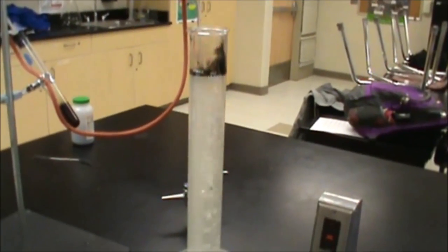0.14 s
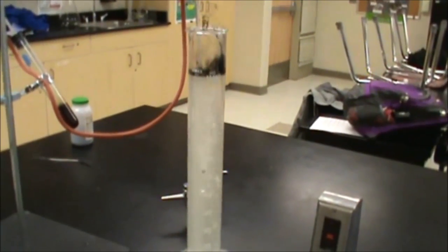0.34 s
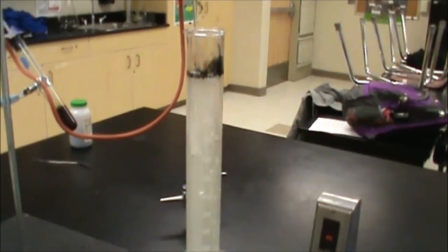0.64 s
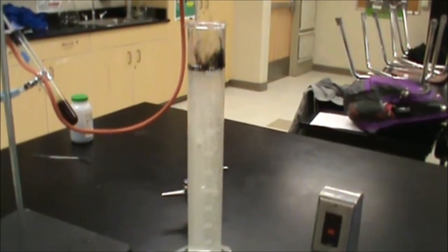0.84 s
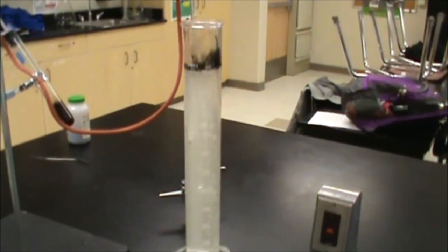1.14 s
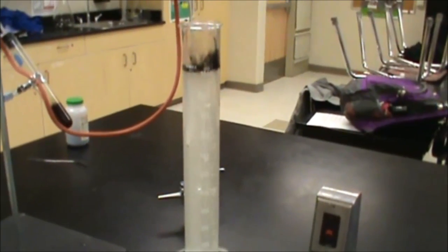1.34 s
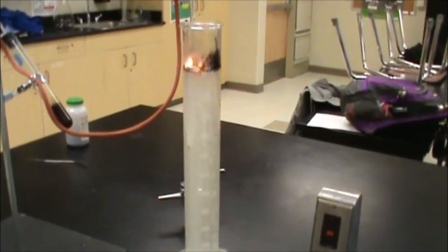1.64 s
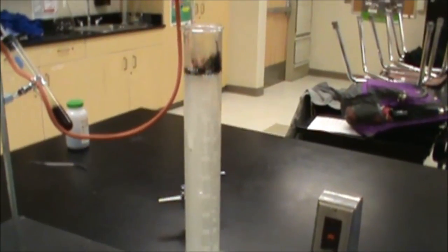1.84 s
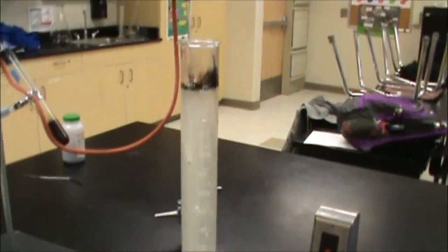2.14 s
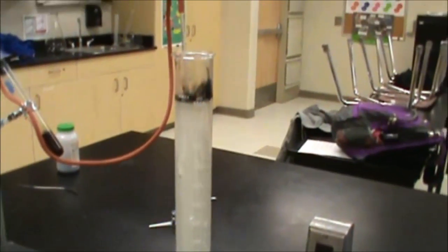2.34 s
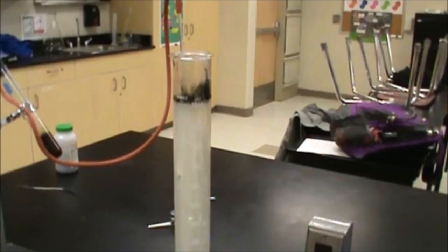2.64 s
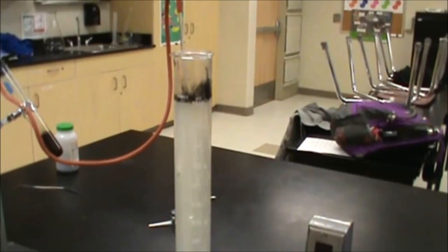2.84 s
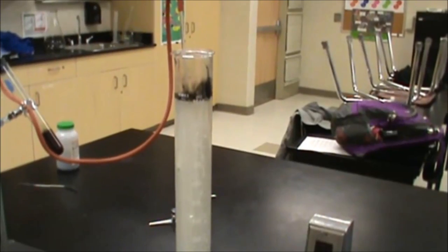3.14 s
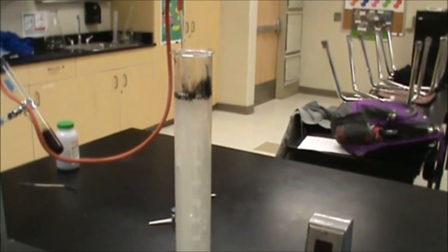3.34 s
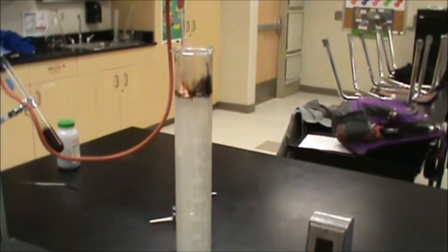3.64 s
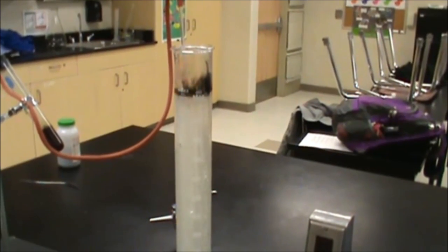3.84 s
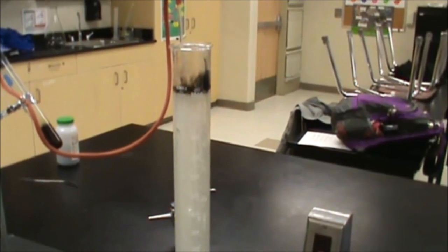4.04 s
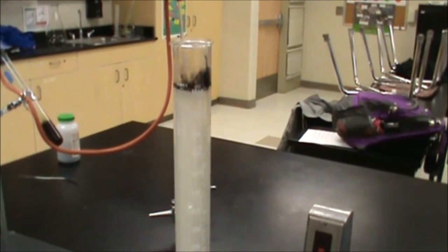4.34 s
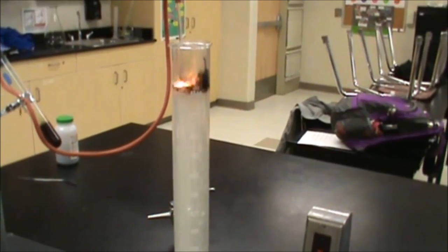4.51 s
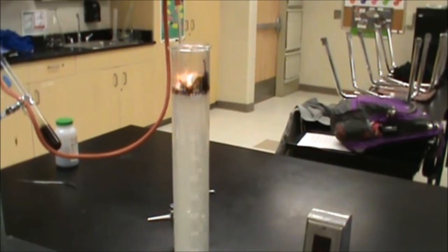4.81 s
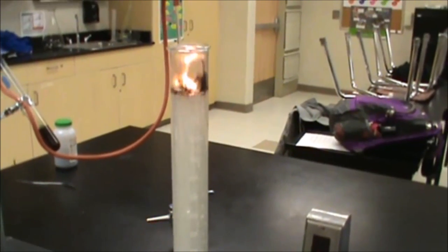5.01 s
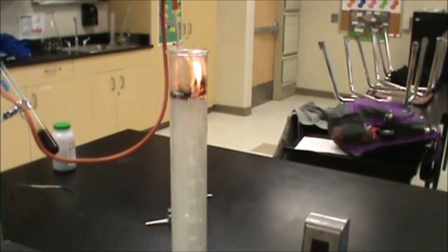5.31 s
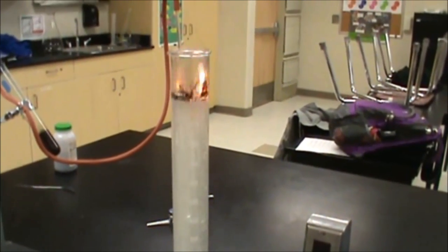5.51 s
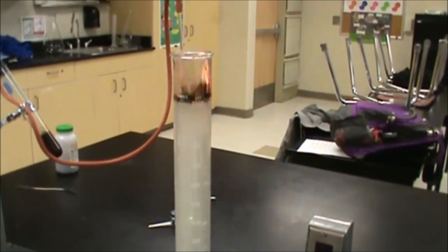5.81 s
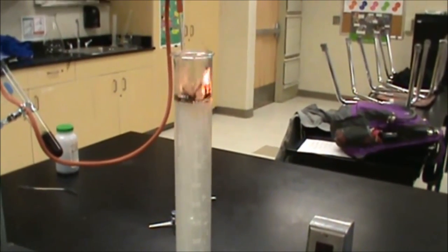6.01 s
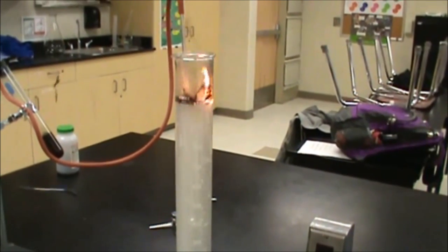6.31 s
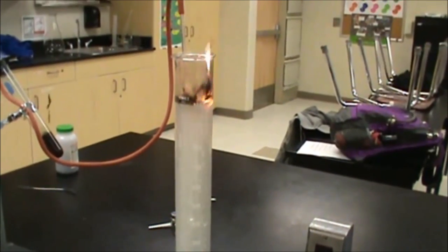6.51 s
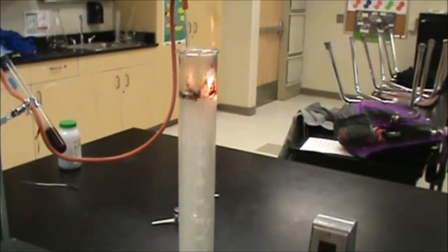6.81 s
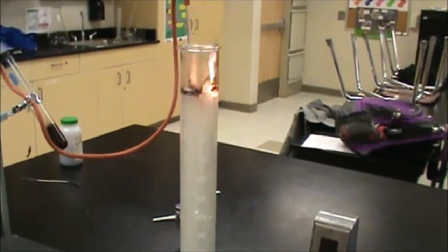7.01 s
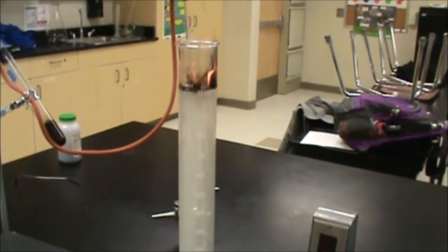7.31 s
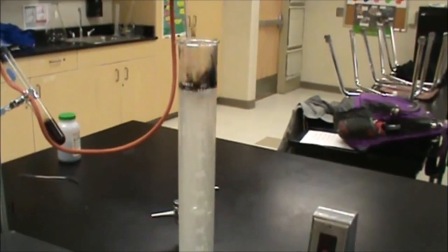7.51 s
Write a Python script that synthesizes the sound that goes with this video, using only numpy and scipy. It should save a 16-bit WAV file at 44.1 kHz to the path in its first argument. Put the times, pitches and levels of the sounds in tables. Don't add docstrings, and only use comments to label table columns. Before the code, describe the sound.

Gas bubbles ignite at the top of a tall water-filled cylinder. Scattered hollow pops with bright film ticks come first, a stronger one near 1.5 seconds, then sharp loud bursts around 3.5 and 3.9. From 5 seconds pops crowd together, with a faint sinking whistle. Fizz, flame flutter and low ventilation continue throughout. Close stereo microphone in a hard-walled laboratory, with slightly dull top end.

```python
import sys
import numpy as np
from scipy import signal
from scipy.fft import rfft, irfft, next_fast_len
from scipy.io import wavfile
from scipy.ndimage import uniform_filter1d

SR = 44100
rng = np.random.default_rng(int(sys.argv[2]) if len(sys.argv) > 2 else 0)


def gain_from_decibels(decibels):
    exponent = np.asarray(decibels, float) / 20
    return 10 ** exponent


def unload_wav(signal):
    wavfile.write(
        sys.argv[1],
        SR,
        np.round(np.clip(np.atleast_2d(signal).T, -1, 1) * 32767).astype(np.int16),
    )


N = 337799


def rms_one(x):
    return x / np.sqrt(np.mean(x ** 2) + 1e-20)


def at_hz(points, hz):
    points = np.array(points)
    return np.interp(np.log(hz), np.log(points[:, 0]), points[:, 1])


def band(x, low_hz, high_hz):
    edges = [low_hz, min(high_hz, 0.45 * SR)]
    return signal.sosfilt(signal.butter(2, edges, "band", fs=SR, output="sos"), x)


def ring(x, hz, t60):
    r, w = gain_from_decibels(-60 / (t60 * SR)), 2 * np.pi * hz / SR
    return signal.lfilter([0, np.sin(w)], [1, -2 * r * np.cos(w), r * r], x + 1e-18)


def drift(rate_hz):
    r = np.exp(-2 * np.pi * rate_hz * 40 / SR)
    slow = signal.lfilter([1], [1, -2 * r, r * r], rng.standard_normal(N // 40 + 2002))[2000:]
    return np.interp(np.arange(N) / 40, np.arange(len(slow)), rms_one(slow))


def add(tracks, s, peak_db, sound):
    i = round(s * SR)
    scaled = gain_from_decibels(peak_db) * sound / np.max(np.abs(sound))
    tracks[0][i:i + len(sound)] += scaled[:N - i]
    tracks.append(tracks.pop(0))


# t/s, level/dB, air column f/Hz, body/dB and bite/dB re level
SLOW_FLASHES = [(0.021, -17.5, 860, -22, -21), (0.403, -17.5, 1760, -8, -12), (0.855, -25.5, 836, -20, -36),
                (1.542, -13.5, 891, 0, -21), (2.152, -26.5, 965, 3, -38), (3.284, -19.5, 818, -44, -28),
                (3.4, -26, 844, -25, -14), (3.51, -19, 920, 1, 0), (3.562, -10.5, 872, -43, -12.5),
                (3.925, -16.5, 1120, -24, 0), (3.938, -23, 1830, -17, -30), (4.514, -13.5, 1050, 2, -13),
                (5.486, -19.5, 970, -2.5, -32), (6.022, -17.5, 884, -7, -40),
                (6.157, -8.5, 880, -10.5, -35), (6.979, -20, 886, -8, -16), (7.044, -24, 930, -4, -14),
                (7.107, -11, 1004, -2.5, -33), (7.455, -21.5, 894, -2.5, -12)]
# t/s, level/dB, air column f/Hz, body/dB and bite/dB re level
QUICK_FLASHES = [(0.074, -35.5, 850, 2.5, 6), (0.409, -14.5, 1236, -14, -11), (0.805, -23.5, 770, -13, -33),
                 (1.053, -14, 838, -9, -43), (1.548, -13.5, 973, -7, -31), (1.852, -27.5, 824, -20, -8),
                 (2.267, -18, 950, -12, -12), (2.509, -22, 880, -13, -21), (3.569, -22, 875, 7.5, -25),
                 (3.592, -15, 880, -2, -19), (3.899, -17.5, 1010, -2, -12.5), (4.877, -32, 980, 2, -1),
                 (5.111, -27, 900, -1.5, -4), (5.261, -10, 1125, -19, -15.5), (5.297, -9, 1154, -8.5, -19),
                 (5.324, -20, 990, -20, -30), (5.466, -16.5, 1060, -6.5, -9.5),
                 (5.526, -17.5, 895, -4.5, -15), (5.801, -19.5, 854, -8.5, -12),
                 (5.834, -18.5, 970, -4, -14), (5.948, -19.5, 990, 2, -6.5), (6.445, -18, 870, -6.5, -11.5),
                 (6.583, -29, 860, 1.5, -6), (6.956, -17, 907, -3, -24)]
# t/s, level/dB, air column f/Hz
GULPS = [(1.354, -37.5, 1150), (1.63, -29, 805), (1.722, -29.5, 1000), (1.925, -30.5, 920),
         (3.714, -24.5, 936), (3.884, -25.5, 835), (4.504, -20, 695), (5.07, -40.5, 940),
         (6.361, -32.5, 930), (6.796, -23.5, 954), (6.81, -33, 1000), (6.856, -27.5, 890)]
# t/s, level/dB, air column f/Hz
BLIPS = [(0.123, -28.5, 1240), (0.19, -45, 900), (1.118, -27.5, 780), (1.823, -24, 805), (1.959, -37, 970),
         (1.973, -38, 930), (2.079, -28.5, 850), (3.752, -28.5, 1010), (3.834, -29.5, 945),
         (4.829, -31.5, 1050), (4.995, -22.5, 840), (5.029, -49, 980), (5.148, -24.5, 1170),
         (5.183, -25, 1050), (5.219, -31, 870), (5.656, -26, 910), (5.769, -27.5, 940), (5.903, -23.5, 940),
         (6.078, -23, 890), (6.125, -25, 878), (6.24, -25.5, 887), (6.298, -28.5, 940), (6.382, -25.5, 935),
         (6.495, -24.5, 875), (6.69, -24.5, 930), (6.867, -25.5, 980), (7.293, -27, 876),
         (7.317, -23.5, 880), (7.478, -27, 890)]


def flashes():
    slow_ms, quick_ms, small_ms = 3.3, 1, 2.56
    pops = [(*row, slow_ms) for row in SLOW_FLASHES]
    pops += [(*row, quick_ms) for row in QUICK_FLASHES]
    pops += [(*row, 1, -12.5, small_ms) for row in GULPS]
    pops += [(*row, -6.5, -20, small_ms) for row in BLIPS]
    pops.sort()
    places, t = np.zeros((4, N)), np.arange(2048) / SR
    out = list(places)
    burn_s = np.array(pops)[:, 5:] / 1000
    burn = np.exp(-t / burn_s) * (1 - np.exp(-t / (0.18 * burn_s)))
    kick = 0.46 * np.exp(-((t - 0.0008) / 0.00033) ** 2)
    push = burn * rng.standard_normal(burn.shape) + kick
    columns = band(push, 546, 2740)
    bodies = band(ring(push, 676, 0.013), 285, 820)
    bites = band(ring(push, 1650, 0.00044), 1060, 1660)
    for (s, peak_db, hz, body_db, bite_db, _), column, body, bite in zip(pops, columns, bodies, bites):
        add(out, s - 0.0012, peak_db - 2.5, ring(column, hz, t60=0.02))
        add(out, s - 0.0012, peak_db + body_db + 1.5, body)
        add(out, s - 0.0008, peak_db + bite_db + 5.0, bite)
    return places


# t/s, level/dB, f/Hz, swell/ms
KNOCKS = [(0.021, -23.5, 830, 0.56), (0.401, -14, 950, 0.72), (0.406, -15.5, 1180, 1),
          (0.81, -26, 689, 0.62), (1.051, -18, 794, 0.99), (1.545, -12, 940, 0.53),
          (1.851, -16.5, 700, 0.8), (2.152, -16, 810, 0.96), (2.267, -24, 920, 0.64),
          (2.507, -13.5, 870, 0.69), (3.284, -15.5, 795, 0.88), (3.4, -23, 820, 0.71),
          (3.508, -21, 918, 0.44), (3.5573, -10, 840, 0.76), (3.569, -6.5, 870, 0.28),
          (3.876, -29, 544, 0.8), (3.899, -4.5, 690, 0.45), (3.915, -22, 1050, 1), (3.923, -17, 1180, 1),
          (4.512, -15.5, 656, 0.64), (4.876, -21, 650, 0.77), (4.993, -24, 980, 0.45),
          (5.111, -14.5, 810, 0.52), (5.182, -20.5, 910, 0.61), (5.219, -19.5, 840, 0.51),
          (5.258, -12.5, 1090, 1), (5.295, -7, 1160, 1), (5.466, -14, 921, 0.32), (5.525, -33, 910, 0.68),
          (5.801, -11.5, 675, 0.95), (5.832, -28, 915, 0.67), (5.852, -27, 977, 0.46),
          (5.949, -15, 945, 0.47), (6.022, -13.5, 836, 1), (6.156, -12, 884, 0.63), (6.168, -16, 910, 0.97),
          (6.18, -11, 920, 1), (6.446, -17.5, 830, 0.34), (6.583, -20.5, 610, 1), (6.689, -23, 980, 0.72),
          (6.797, -33, 920, 0.54), (6.856, -27, 736, 0.83), (6.866, -20.5, 840, 0.58),
          (6.956, -12.5, 923, 0.43), (6.979, -16, 907, 0.92), (7.043, -16.5, 910, 0.52),
          (7.107, -6.5, 940, 0.55), (7.144, -17, 980, 0.61), (7.454, -21.5, 900, 1)]
# t/s, level/dB, f/Hz, swell/ms
ROLLS = [(.403, -20, 1786, 2.4), (.409, -19.5, 1200, 3.5), (.424, -25, 840, 4.2), (.812, -24.5, 710, 5.2),
         (.854, -33, 806, 1.8), (1.051, -20.5, 880, 3.3), (1.066, -18.5, 916, 6), (1.548, -13, 956, 3.2),
         (1.561, -23, 965, 4.5), (1.579, -30, 940, 2.6), (1.974, -23, 910, 1), (2.079, -31, 860, 0.84),
         (2.32, -32, 1160, 2.3), (3.513, -19.5, 1810, 2.3), (3.567, -14, 890.5, 5.4),
         (3.580, -12, 894, 1.8), (3.592, -28, 920, 1.7), (3.928, -13, 1140, 2.5), (3.924, -6, 1880, 0.25),
         (3.939, -15, 1855, 2.8), (3.953, -19.5, 1146, 2.7), (3.931, -16, 1825, 1.8),
         (3.961, -27, 1850, 4.6), (3.982, -32, 1940, 4), (4.512, -20.5, 660, 2.4), (4.517, -25, 1240, 3.7),
         (5.208, -22, 950, .8), (6.157, -11.5, 830, 2.1), (6.17, -17, 880, 2.3), (7.109, -20, 934, 2)]


def knocks():
    out, t = [np.zeros(N)], np.arange(1536) / SR
    for s, peak_db, hz, swell_ms in KNOCKS + ROLLS:
        age = t / (max(swell_ms, 0.3) / 1000)
        add(out, s + 0.0006, peak_db - 2.5, age * np.exp(-age) * np.sin(2 * np.pi * hz * t))
    return band(out[0], 236, 2900)


# t/s, level/dB, centre f/Hz
CRACKS = [(0.0212, -26, 2620), (0.1226, -33, 2020), (0.405, -24.5, 2410), (0.6197, -31, 2390),
          (1.539, -32, 2600), (1.8507, -36, 3360), (2.2675, -28, 2850), (2.5062, -42, 3350),
          (3.2822, -32.5, 2340), (3.4007, -38, 3330), (3.5129, -20, 1900), (3.5642, -27, 2070),
          (3.878, -32, 2600), (3.924, -12, 2800), (4.5094, -25.5, 2970), (4.875, -63, 3180),
          (5.112, -34, 3190), (5.148, -32, 3160), (5.2596, -28, 3170), (5.2954, -24.5, 2130),
          (5.466, -35, 2550), (5.5253, -36, 2660), (5.801, -42, 2610), (5.8341, -35, 2350),
          (5.852, -34, 2800), (5.9483, -28, 2000), (6.0232, -30, 2630), (6.1575, -23.5, 2700),
          (6.4453, -30, 2010), (6.6892, -48, 2860), (6.956, -41, 2620), (7.0442, -34.5, 2870),
          (7.107, -32, 2700), (7.4567, -26, 2700), (1.547, -27.5, 2400), (3.5619, -27, 4600),
          (3.512, -26.5, 5200), (6.868, -30.5, 2490), (6.982, -30.5, 3400), (6.735, -40, 2300)]


def cracks():
    places, t = np.zeros((4, N)), np.arange(2048) / SR
    out = list(places)
    edges = rng.standard_normal((len(CRACKS), len(t))) * np.exp(-t / 0.0055)
    for (s, peak_db, hz), edge in zip(CRACKS, edges):
        add(out, s - 0.0006, peak_db - 1.0, band(edge, hz / 1.41, hz * 1.55))
    return places


# t/s, level/dB, f/Hz
THUMPS = [(0.048, -38.5, 134), (0.804, -41, 181), (1.5425, -16, 155.6), (1.631, -34, 261),
          (1.852, -37.5, 160), (1.925, -40, 154), (2.15, -38, 204), (2.267, -38.5, 143), (3.066, -51, 163),
          (.49, -43.5, 254), (2.4, -43.5, 292), (3.11, -45, 302), (6.241, -34.5, 332), (1.359, -44, 336),
          (3.5615, -18.5, 174), (3.717, -37.5, 186), (3.878, -33, 190), (4.509, -28, 142),
          (4.517, -16, 161.6), (4.877, -40, 140), (5.11, -42, 188), (5.258, -28.5, 163), (5.295, -27, 153),
          (5.466, -31.5, 155), (5.484, -40, 160), (5.803, -36.5, 150), (5.95, -33.5, 141),
          (6.019, -33, 154), (6.079, -36, 177), (6.157, -37, 106), (6.447, -40.5, 133), (6.797, -40, 192),
          (6.98, -40, 148), (7.108, -30.5, 153)]


def thumps():
    places, t = np.zeros((4, N)), np.arange(4096) / SR
    out = list(places)
    swell = t * np.exp(-t / 0.0001)
    for s, peak_db, hz in THUMPS:
        add(out, s - 0.001, peak_db + 6.0, band(ring(swell, hz, 0.048), 56, max(250, hz * 1.24)))
    return places


# t/s, level/dB, centre f/Hz
SNAPS = [(0.0213, -19, 8300), (0.027, -27, 7560), (0.0727, -19, 8650), (0.1233, -24, 7340),
         (0.406, -23.5, 7250), (1.118, -26, 5600), (2.395, -23.5, 4200), (1.286, -20, 8800),
         (1.3094, -21, 9880), (1.7714, -35, 5600), (2.11, -28, 8750), (2.2676, -23.5, 4600),
         (2.5114, -40, 7800), (3.285, -24, 8350), (3.885, -20.5, 5540), (3.924, -16, 6600),
         (4.0454, -19, 10100), (4.559, -21.5, 10900), (4.8792, -22.5, 5560), (5.146, -26, 5430),
         (5.244, -27, 6340), (5.262, -19, 4900), (5.297, -22, 6300), (5.3308, -28, 7950), (5.44, -23, 4960),
         (5.65, -24.5, 7850), (5.813, -24, 9300), (6.2158, -19, 5700), (6.3475, -27, 9170),
         (6.38, -22.5, 8340)]
# t/s, level/dB, centre f/Hz
DROPLETS = [(7.1085, -24, 6100), (0.037, -20, 6800), (0.085, -18, 7800), (2.506, -11.5, 9500),
            (3.2848, -14.5, 8400), (3.582, -20, 6900), (3.5976, -25, 8800), (3.6295, -27, 9570),
            (3.6434, -28, 6350), (4.0686, -19.5, 10000)]


def snaps():
    places, t = np.zeros((4, N)), np.arange(2048) / SR
    out = list(places)
    film_t60_s, droplet_t60_s = 0.011, 0.005
    ticks = [(*row, film_t60_s) for row in SNAPS] + [(*row, droplet_t60_s) for row in DROPLETS]
    for s, peak_db, hz, t60 in ticks:
        puff = gain_from_decibels(-60 * t / t60) * (1 - np.exp(-t / (0.03 * t60)))
        noise = rng.standard_normal(len(t))
        add(out, s - 0.0005, peak_db - 4.0, band(noise * puff, hz / 1.36, hz * 1.44))
    return places


# t/s, level/dB, centre f/Hz, length/s
SPURTS = [(0.048, -28, 7650, 0.053), (0.462, -28.5, 4230, 0.014), (0.615, -29.5, 4900, 0.046),
          (0.78, -32, 8600, 0.04), (1.277, -28, 8150, 0.022), (1.316, -32, 4700, 0.049),
          (1.751, -28, 5500, 0.036), (5.445, -31, 4760, 0.096), (6.213, -26, 5640, 0.042)]


def spurts():
    places = np.zeros((4, N))
    out = list(places)
    for s, peak_db, hz, length_s in SPURTS:
        swell = np.hanning(round(np.clip(length_s, 0.01, 0.09) * SR)) ** 0.5
        noise = rng.standard_normal(len(swell))
        add(out, s - 0.004, peak_db - 6.0, band(noise * swell, hz / 1.25, hz * 1.18))
    return places


# t/s, level/dB, f/Hz
PINGS = [(0.2947, -36, 2990), (0.625, -31, 2530), (1.941, -27, 4530), (2.269, -26.5, 3790),
         (2.5062, -26.5, 3600), (2.7213, -32, 3820), (3.044, -28, 2600), (3.2817, -38, 3980),
         (3.4012, -29, 3400), (6.983, -34, 3900), (6.689, -31.5, 2920), (3.923, -11.5, 3860),
         (4.511, -20.5, 4150), (3.941, -19, 3680), (3.961, -23, 3660), (5.113, -28.5, 4210),
         (5.15, -29, 4120), (5.2193, -29, 4050), (5.2452, -36, 4010), (5.2607, -20, 4000),
         (5.298, -16, 4050), (5.329, -27, 4130), (5.4394, -25, 4840), (5.949, -26.5, 3786),
         (6.161, -23, 4080), (6.2181, -24, 4790), (6.446, -27.5, 3890), (6.5844, -30, 3826),
         (7.0432, -32, 3810), (7.106, -29, 4700)]


def pings():
    places, t = np.zeros((4, N)), np.arange(2048) / SR
    out = list(places)
    for s, peak_db, hz in PINGS:
        puff = (rng.standard_normal(len(t)) + np.sin(2 * np.pi * hz * t)) * t * np.exp(-t / 0.0019)
        add(out, s - 0.0008, peak_db - 11.5, ring(puff, hz, t60=0.02))
    return places


# t/s, f/Hz, level/dB
WHISTLE = [
    (5.04, 4340, -73),
    (5.11, 4230, -53),
    (5.25, 4030, -57),
    (5.34, 3930, -57),
    (5.42, 3850, -64),
]


def whistle():
    s, hz, level_db = np.transpose(WHISTLE)
    t, width_hz = np.arange(N) / SR, 30
    turn = 2 * np.pi * np.cumsum(np.interp(t, s, hz)) / SR
    tone = drift(width_hz) * np.sin(turn) + drift(width_hz) * np.cos(turn)
    return gain_from_decibels(np.interp(t, s, level_db, left=-120, right=-120) - 8.0) * tone


def fizz(per_s, low_hz, high_hz, cycles):
    sizes = gain_from_decibels(14.4 * np.minimum(rng.exponential(1, N), 3.8)) * rng.choice([-1, 1], N)
    born = rng.random(N) < per_s * gain_from_decibels(5.0 * drift(9)) / SR
    dealt = rng.integers(0, 12, N)
    total = np.zeros(N)
    for k, hz in enumerate(np.geomspace(low_hz, high_hz, 12)):
        total += ring(sizes * born * (dealt == k), hz, cycles / hz)
    return rms_one(total)


# t/s, flame level/dB, bubbling level/dB
SIMMER = [(0.0, -48, -49.5), (0.19, -53, -50.5), (1.0, -51, -50.5), (1.32, -49, -46), (1.58, -56, -49.5),
          (1.75, -44, -48.5), (2.84, -52.5, -50.5), (3.48, -49.5, -49.5), (3.77, -46, -50),
          (4.48, -51.5, -48.5), (4.67, -46, -48), (4.95, -50, -49), (5.63, -44.5, -46), (5.82, -53.5, -50),
          (6.25, -45.5, -47.5), (6.53, -49.5, -49), (7.02, -45.5, -50.5), (7.66, -50.5, -48.5)]
# f/Hz, level/dB per Hz
HUSH = [(15, -41), (25, -12.5), (155, 2.5), (376, -2.5), (479, -4.5), (913, -7), (1070, -10.5),
        (1370, -3.5), (2100, -24), (8250, -22), (12700, -28), (13700, -29), (15300, -66)]
# f/Hz, likeness (1 = the same)
LIKENESS = [(60, 0.98), (150, 1), (380, 0.88), (950, 0.49), (2380, 0.66), (5980, 0.96), (15000, 0.87)]


def simmer():
    s, *columns = np.transpose(SIMMER)
    t = np.arange(N) / SR
    flame_db, bubbling_db = [np.interp(t, s, c) for c in columns]
    flutter_db = flame_db - 0.8
    spray_db = -48.5 + 0.54 * (bubbling_db - np.mean(bubbling_db)) + 0.25 * t
    regions, hush = np.zeros((4, 2, N)), np.zeros((2, N))
    white = rng.standard_normal((2, 2, N))
    edges = np.append(np.geomspace(24, 11500, 18), [13600, 16000])
    for k, (low, high) in enumerate(zip(edges, edges[1:])):
        mid, side = band(white[k % 2], low, high)
        hz = np.sqrt(low * high)
        alike = np.clip(at_hz(LIKENESS, hz), -1, 1)
        gain = gain_from_decibels(at_hz(HUSH, hz) + 2.05 * drift(19))
        stereo = np.sqrt(1 + alike) * mid + np.sqrt(1 - alike) * side * [[1], [-1]]
        regions[np.searchsorted([400, 1700, 5200], hz)] += gain * stereo
    for region, level_db in zip(regions, [flame_db, flutter_db, bubbling_db, spray_db]):
        hush += gain_from_decibels(level_db - 1.17) * rms_one(region)
    gurgle = gain_from_decibels(flutter_db - 11.0) * fizz(per_s=180, low_hz=610, high_hz=1400, cycles=4.5)
    crackle = gain_from_decibels(bubbling_db - 10.0) * fizz(per_s=500, low_hz=2570, high_hz=4660, cycles=12.0)
    spray = gain_from_decibels(spray_db - 8.0) * fizz(per_s=1200, low_hz=6280, high_hz=10000, cycles=9.1)
    return hush, gurgle + crackle + spray


# f/Hz, t60/s, level/dB
ROOM_TAIL = [(101, 0.62, -32), (523, 0.33, -27), (1000, 0.4, -27), (1880, 0.35, -30.5), (4200, 0.006, -25),
             (11900, 0.53, -32.5)]
# f/Hz, level/dB
STANDING = [(140, -4), (305, 4), (540, -29), (660, 5), (770, -2), (845, -5.5), (920, 8.5), (975, 8),
            (1107, -41), (1165, -37), (1306, -31), (1514, 6.5), (1874, -5)]
# delay t/s, left level/dB, right level/dB
ECHOES = [(.0065, -11, -29), (0.0105, -15, -24), (.0175, -19, -47), (0.028, -8.5, -15)]


def room(tracks):
    t = np.arange(20000) / SR
    noise = rng.standard_normal((len(tracks), 3, len(t)))
    noise = noise[:, :1] + 0.5 * noise[:, 1:]
    response = np.zeros(noise.shape)
    for hz in 58 * 2.0 ** np.arange(8):
        t60, level_db = [at_hz(np.array(ROOM_TAIL)[:, [0, k]], hz) for k in (1, 2)]
        response += band(noise, hz / np.sqrt(2), hz * np.sqrt(2)) * gain_from_decibels(level_db - 60 * t / t60)
    response *= 1 - np.exp(-(t / 0.00078) ** 2)
    click = (t == 0) * 1.0
    for hz, level_db in STANDING:
        varied_db = rng.normal(0, 3.5, (len(tracks), 1, 1))
        response += gain_from_decibels(level_db - 56.0 + varied_db) * ring(click, hz, t60=0.24)
    for late_s, left_db, right_db in ECHOES:
        echo = band(np.roll(click, round(late_s * SR)), 40, 2800)
        response += gain_from_decibels(np.array([[left_db], [right_db]])) * echo
    response[:, :, 0] += 1
    size = next_fast_len(N + len(t))
    heard = np.sum(rfft(tracks, size)[:, None] * rfft(response, size), axis=0)
    return irfft(heard, size)[:, :N]


def scene():
    hush, bubbles = simmer()
    tracks = flashes() + cracks() + thumps() + snaps() + spurts() + pings()
    tracks[0] += bubbles
    knock, room_share = knocks(), 0.22
    tracks[1] += room_share * knock
    left, right = room(tracks) + (1 - room_share) * knock + whistle()
    zero, pole = np.exp(-2 * np.pi * np.array([45, 190]) / SR)
    return np.array([signal.lfilter([1, -zero], [1, -pole], left), right]) + hush


# from t/s, to t/s
NARROW = [(.1, .24), (.76, 1.1), (1.48, 1.82), (2.8, 3.02), (3.2, 3.6), (3.78, 3.92), (4.08, 4.24),
          (4.41, 4.52), (4.6, 5.3), (6.8, 6.99), (7.06, 7.4)]


def fold_treble(x):
    side, t = (x[0] - x[1]) / 2, np.arange(N) / SR
    hz = np.arange(N // 2 + 1) * SR / N
    treble = irfft(rfft(side) * (hz > 3370), N)
    narrow = uniform_filter1d(sum((t > a) * (t < b) * 1.0 for a, b in NARROW), size=512)
    return x - np.outer([1, -1], treble * narrow)


def band_limit(x):
    return signal.sosfilt(signal.butter(12, 15880, fs=SR, output="sos"), x)


# from t/s, to t/s
DULL = [(0, .15), (.42, .7), (1.58, 1.83), (2.48, 2.52), (3.27, 3.31), (3.5, 3.59), (3.92, 4.01),
        (4.03, 4.09), (4.52, 4.57), (4.94, 5.02), (5.27, 5.56), (5.87, 5.96), (6.15, 6.62), (6.94, 7.27)]


def record(dry):
    top_hz, cut_hz = 13400, 15400
    size = next_fast_len(N)
    spectrum, hz = rfft(dry, size), np.arange(size // 2 + 1) * SR / size
    low = irfft(spectrum * (hz < top_hz), size)[:, :N]
    top = irfft(spectrum * (hz >= top_hz) * (hz < cut_hz), size)[:, :N]
    hz, t, cells = signal.stft(top, SR, nperseg=1024)
    patch = np.ix_((hz // 170).astype(int), (t // 0.046).astype(int))
    kept = rng.random((200, 200))[patch] > ((hz - top_hz) / 2800)[:, None]
    top = gain_from_decibels(2.0) * signal.istft(cells * kept, SR)[1][:, :N]
    t = np.arange(N) / SR
    calm = 1.0 - sum((t >= a) * (t < b) for a, b in DULL)
    return band_limit(fold_treble(low + top * uniform_filter1d(calm, size=512)))


dry = scene()
out = record(dry)
unload_wav(out)
```